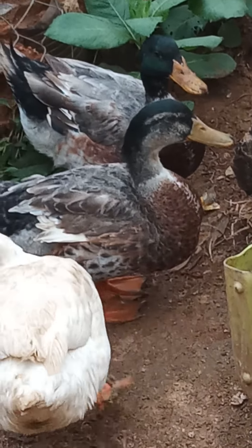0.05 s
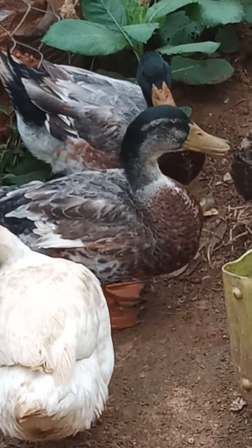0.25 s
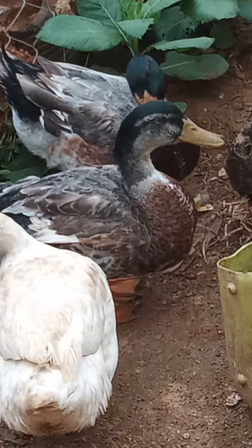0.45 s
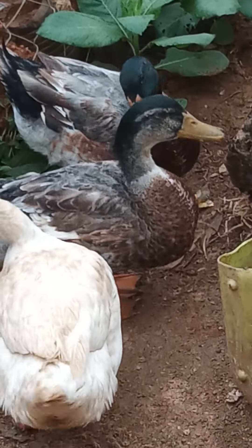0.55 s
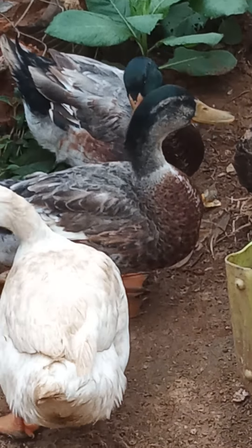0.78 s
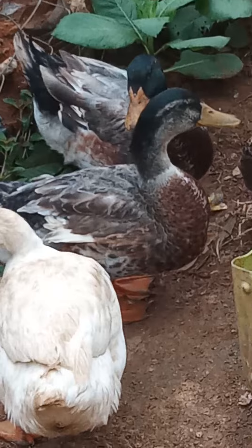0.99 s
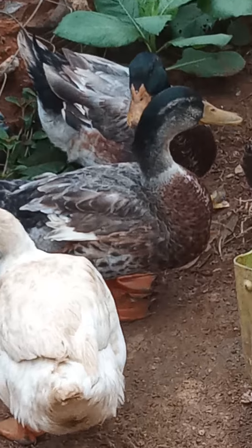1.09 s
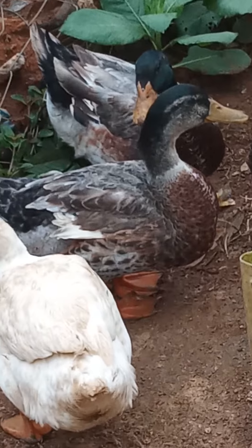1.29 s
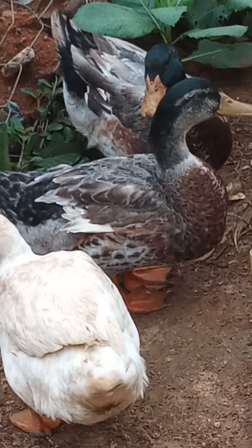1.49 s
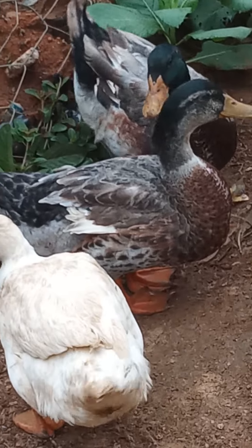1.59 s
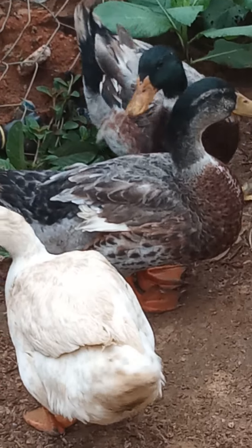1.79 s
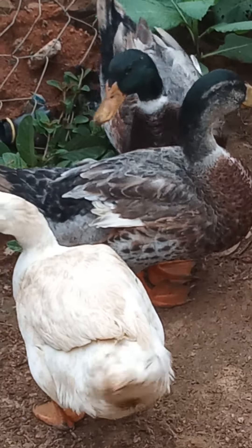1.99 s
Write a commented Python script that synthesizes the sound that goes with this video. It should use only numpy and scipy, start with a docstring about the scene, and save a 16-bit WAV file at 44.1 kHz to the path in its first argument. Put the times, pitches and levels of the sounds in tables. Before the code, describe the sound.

Short, hoarse duck quacks come at uneven intervals in a yard with a low hum.

```python
"""A distant engine hums over outdoor air throughout. At the start an insect trills, the tail of an earlier
quack fades, two faint hoarse notes sound and webbed feet pat the earth. From 0.2 s drakes a few steps away give
ten short raspy quacks, each a train of air puffs, about ninety a second, exciting the resonances of throat and
bill, with a brief yard echo. Two more trills and two more pats fall among them. The last quack comes near 1.7
s, and a faint scuff of grit follows."""
import sys
import numpy as np
from scipy import signal
from scipy.fft import rfft, irfft, next_fast_len
from scipy.io import wavfile
from scipy.ndimage import map_coordinates

SR = 44100
rng = np.random.default_rng(int(sys.argv[2]) if len(sys.argv) > 2 else 0)


def unload_audio(sound):
    """Save the sound as a 16-bit wav file, at the path given as the first command line argument."""
    columns = np.transpose(np.atleast_2d(sound))
    # keep every value between -1 and 1, then stretch to whole-number steps
    steps = np.round(np.clip(columns, -1, 1) * 32767)
    wavfile.write(sys.argv[1], SR, steps.astype(np.int16))


N = 90404


def amp(db):
    return 10 ** (np.asarray(db) / 20)

def rms(x):
    return np.sqrt(np.mean(x ** 2) + 1e-20)

def unit(x):
    return x / rms(x)

def clock():
    return np.arange(N) / SR

def gaussian(t, width):
    return np.exp(-.5 * (t / width) ** 2)

def along(points, hz):
    """Interpolation of (frequency, value) points on a logarithmic frequency axis."""
    freqs, values = np.transpose(points)
    return np.interp(np.log(hz + 1), np.log(freqs + 1), values)

def filtered(x, response):
    """Linear filtering: the spectrum of x is multiplied by a frequency response."""
    size = next_fast_len(N + SR // 4)
    return irfft(rfft(x, size) * response(np.fft.rfftfreq(size, 1 / SR)), size)[:N]

def resonate(x, resonances):
    """Forced vibration: x drives steep parallel resonators, each with its own share of the energy."""
    out = 0
    for hz, width, db in resonances:
        section = np.concatenate(signal.iirpeak(hz, hz / (2 * width), SR))
        out = out + amp(db) * unit(signal.sosfilt([section] * 4, x))
    return unit(out)

def burst(time, half_length, resonances):
    """Transient excitation: noise under a Gaussian envelope drives resonators."""
    swell = gaussian(clock() - time, half_length) + 1e-9
    return rms(swell) * resonate(swell * rng.standard_normal(N), resonances)

def add(out, start, x):
    """Superposition: x is summed into out from a start time."""
    i = round(start * SR)
    x = x[max(-i, 0):N - i]
    out[max(i, 0):][:len(x)] += x


# outdoor noise spectrum (frequency [Hz], relative density [dB])
AIR_SPECTRUM = [(15, -120), (30, -100), (45, -94), (90, -94.5), (140, -95), (220, -99), (350, -106),
                (600, -103), (1000, -102), (1500, -100.5), (2000, -100), (3100, -101), (3500, -108),
                (4000, -100), (5000, -107), (6300, -112), (7300, -110), (8000, -122), (8650, -111),
                (9600, -128), (13800, -136), (14800, -125), (15700, -122)]

def air(level_db=-63.5):
    """Stationary noise: the outdoor background keeps one spectral shape."""
    noise = filtered(rng.standard_normal(N), lambda hz: amp(along(AIR_SPECTRUM, hz)))
    return amp(level_db) * unit(noise)


# strong engine harmonics (multiple of the firing rate [1], level [dB])
ENGINE_HARMONICS = [(2, -78), (5, -65.5), (6, -72.5), (14, -82.5), (16, -75.5), (18, -83.5), (23, -83.5),
                    (28, -70.5), (39, -75.5), (52, -70), (53, -71.5), (55, -74)]
# spectral envelope of the other harmonics (frequency [Hz], level [dB])
ENGINE_ENVELOPE = [(50, -89), (200, -93.5), (330, -93), (520, -99.5), (620, -84), (770, -82), (1020, -81.5),
                   (1230, -84), (1340, -89), (1600, -85.5), (2000, -90.5), (2600, -101.5)]

def engine(firing_hz=25.76):
    """Harmonic series: periodic firing puts a far engine's sound at multiples of one rate."""
    orders = np.arange(2, 100)
    levels = along(ENGINE_ENVELOPE, orders * firing_hz) + rng.standard_normal(len(orders))
    for order, db in ENGINE_HARMONICS:
        levels[orders == order] = db
    drift = map_coordinates(rng.standard_normal(16), [clock() * 5])
    cycles = firing_hz * clock() + .001 * drift
    return sum(np.sqrt(2) * amp(db) * np.sin(2 * np.pi * (order * cycles + phase))
               for order, db, phase in zip(orders, levels, rng.random(len(orders))))


# wing resonances (offset from the chirp pitch [Hz], bandwidth [Hz], relative level [dB])
WING_MODES = [(0, 80, 0), (-230, 200, -13)]
# trills (first chirp [s], chirp rate [1/s], level [dB], chirps [count])
INSECT_TRILLS = [(.001, 25.3, -74.5, 3), (.110, 25.7, -67, 6), (.742, 25.0, -67, 7),
                 (1.448, 29.3, -67.5, 9)]

def insect(chirp_hz=8722, half_length_s=.0079):
    """Stridulation: evenly spaced strokes excite the high resonances of a wing."""
    out = np.zeros(N)
    t = np.arange(-SR // 20, SR // 20) / SR
    wing = [(chirp_hz + offset, width, db) for offset, width, db in WING_MODES]
    for start, rate, db, count in INSECT_TRILLS:
        for k in range(count):
            chirp = gaussian(t, half_length_s) * resonate(rng.standard_normal(len(t)), wing)
            add(out, start + k / rate + t[0], amp(db) * chirp)
    return out


# the fading tail of an earlier quack, then two faint notes (time [s], half-length [s], frequency [Hz], level
# [dB])
FAINT_NOTES = [(.006, 0.013, 1657, -59.5), (0.11, 0.03, 597, -71), (.254, 0.0056, 850, -52)]

def faint_notes(bandwidth_hz=108):
    """Narrow-band noise: a brief swell of it is heard as a hoarse tone."""
    out = 0
    for time, half_length, hz, db in FAINT_NOTES:
        swell = gaussian(clock() - time, half_length)
        tone = swell * resonate(rng.standard_normal(N), [(hz, bandwidth_hz, 0)])
        out = out + amp(db) * rms(swell) * unit(tone)
    return out


# foot pats (time [s], half-length [s], level [dB])
FOOT_PATS = [(0.147, 0.0056, -57), (0.185, 0.014, -66), (0.738, 0.022, -68.5), (1.317, .013, -59)]
# scuffs (time [s], level [dB])
GRIT_SCUFFS = [(1.317, -79), (1.957, -85)]
# resonances of earth and of grit (frequency [Hz], bandwidth [Hz], relative level [dB])
EARTH_MODES = [(258, 95, 14), (432, 290, 14), (640, 73, 1)]
GRIT_MODES = [(15300, 500, 0)]

def feet(scuff_half_length_s=.008):
    """Impact and friction: webbed feet draw low pats from the soil and high scuffs from its grit."""
    pats = sum(amp(db) * burst(time, half_length, EARTH_MODES) for time, half_length, db in FOOT_PATS)
    scuffs = sum(amp(db) * burst(time, scuff_half_length_s, GRIT_MODES) for time, db in GRIT_SCUFFS)
    return pats + scuffs


def yard(x, t60_s=.18):
    """Reverberation: diffuse reflections from ground, plants and walls decay exponentially."""
    t = np.arange(SR // 3) / SR
    build_up = 1 - np.exp(-t / .002)
    tail = rng.standard_normal(len(t)) * amp(-60 * t / t60_s) * build_up
    return signal.fftconvolve(x, tail / np.linalg.norm(tail))[:N]


RING_DELAY_S = .0042  # a resonance peaks about this long after its puff

def puffs(t, rate, jitter_s=.0003, shimmer_db=1.7):
    """Jitter and shimmer: the puffs of a nearly periodic train vary in timing and size."""
    k = np.arange(-7, 8)
    peaks = k / rate + jitter_s * rng.standard_normal(len(k))
    age = np.maximum(t - peaks[:, None] + RING_DELAY_S, 0)
    sizes = amp(shimmer_db * rng.standard_normal(len(k)))
    return peaks, age, sizes

def breath(t, rise, fall, exponent=1.98):
    """Amplitude envelope: a bell-shaped swell with separate rise and fall times."""
    return np.exp(-.5 * np.abs(t / np.where(t < 0, rise, fall)) ** exponent)

def puff_rings(age, sizes, resonances, onset_power=3.5, scatter_hz=51.4):
    """Impulse response: at each puff every resonance swells and decays, at a slightly different pitch."""
    out = 0
    for hz, width, db in resonances:
        scaled_age = age * width * np.pi * np.sqrt(onset_power / 2)
        envelope = scaled_age ** onset_power * np.exp(-scaled_age)
        pitch = hz + scatter_hz * rng.standard_normal((len(sizes), 1))
        wave = np.sin(2 * np.pi * (pitch * age + rng.random((len(sizes), 1))))
        out = out + amp(db) * unit(sizes @ (envelope * wave))
    return unit(out)

def turbulence(flow, resonances):
    """Flow noise: its amplitude follows the airflow, and the resonances colour it."""
    return resonate(flow * rng.standard_normal(len(flow)), resonances)


# formants of the voice bands (frequency [Hz], bandwidth [Hz], relative level [dB])
MOUTH_FORMANTS = [(1380, 180, -15), (1620, 220, -16), (1960, 220, -15), (2265, 170, 0)]
BILL_FORMANTS = [(2880, 130, 0), (3240, 110, -12)]
RASP_FORMANTS = [(3860, 150, 0), (4500, 220, -1.5)]
BILL_TIP_FORMANT = [(6152, 235, -13.5)]
# hiss formants (offset from the hiss pitch [Hz], bandwidth [Hz], relative level [dB])
HISS_FORMANTS = [(-330, 170, -5), (30, 130, 0), (400, 150, -8)]
# quacks; the fourth opens with a single hard puff, which has its own row
# (time [s], rise [s], fall [s], puff rate [1/s], throat pitch [Hz], hiss pitch [Hz], hiss lead [s],
#  hiss half-length [s], throat level [dB], mouth level [dB], bill level [dB], rasp level [dB],
#  hiss level [dB])
DRAKE_QUACKS = [ (.216, 0.016, 0.02, 80, 1864, 5700, .006, 0.0096, -56, -45, -61.5, -67, -49),
                (0.336, 0.019, .018, 95, 1860, 5980, 0.00024, .012, -52, -42, -69.5, -61, -56),
                (0.514, 0.02, 0.014, 90, 1690, 5670, 0.00014, 0.013, -58, -52, -59, -62.5, -55),
                (0.572, 0.0071, 0.0048, 93, 2295, 6000, -0.01, 0.0045, -42.5, -43.5, -71, -66, -60),
                (0.592, 0.0073, 0.02, 108, 1785, 6055, -0.003, 0.014, -51.5, -43, -83, -59, -60.5),
                (0.759, 0.026, 0.012, 78, 1757, 5486, 0.0071, .014, -42.5, -52.5, -55, -54.5, -47),
                (0.988, 0.023, .016, 73, 1765, 5330, 0.0046, 0.014, -37.5, -48.5, -51, -45, -39),
                (1.109, 0.017, 0.018, 91, 1665, 5696, 0.0058, 0.015, -56, -45.5, -65.5, -73, -55.5),
                (1.380, 0.018, 0.013, 82.5, 1675, 5670, 0.0065, .012, -51.5, -48, -55, -71, -53.5),
                (1.512, 0.02, 0.015, 84, 1880, 5390, -0.0033, 0.015, -43, -47, -59, -59, -51.5),
                (1.738, 0.019, 0.016, 77.6, 1877, 5330, -0.0059, 0.016, -40.5, -43.5, -43.5, -47, -44.5)]

def drakes(steady_flow=.75, puff_decay_s=.015, throat_width_hz=220, breathy_db=-4,
           high_ring_db=-2.5, high_widening=1.27, cutoff_hz=7240):
    """Source and filter: air puffs excite the formants of throat and bill and modulate a shorter hiss."""
    out = np.zeros(N)
    t = np.arange(-SR // 10, SR // 10) / SR
    for time, rise, fall, rate, throat_hz, hiss_hz, lead, half_length, *levels in DRAKE_QUACKS:
        throat_db, mouth_db, bill_db, rasp_db, hiss_db = levels
        peaks, age, sizes = puffs(t, rate)
        flow = steady_flow + sizes @ (np.exp(-age / puff_decay_s) * (age > 0))
        body = lambda at: breath(at, rise, fall)
        jet = lambda at: breath(at + RING_DELAY_S + lead, half_length, half_length)
        throat = [(throat_hz, throat_width_hz, 0)]
        hiss = [(hiss_hz + offset, width, db) for offset, width, db in HISS_FORMANTS] + BILL_TIP_FORMANT
        voice = 0
        # low bands: ringing outweighs turbulence
        for formants, band_db in [(throat, throat_db), (MOUTH_FORMANTS, mouth_db),
                                  (BILL_FORMANTS, bill_db)]:
            rings = puff_rings(age, sizes * body(peaks), formants)
            noise = amp(breathy_db) * turbulence(body(t) * flow, formants)
            voice = voice + amp(band_db) * rms(body(t)) * unit(rings + noise)
        # high bands: turbulence dominates, and the widened rings die sooner
        for formants, band_db in [(RASP_FORMANTS, rasp_db), (hiss, hiss_db)]:
            damped = [(hz, high_widening * width, db) for hz, width, db in formants]
            rings = amp(high_ring_db) * puff_rings(age, sizes * jet(peaks), damped)
            noise = turbulence(jet(t) * flow, formants)
            voice = voice + amp(band_db) * rms(jet(t)) * unit(rings + noise)
        add(out, time + t[0], voice)
    return signal.sosfilt(signal.butter(8, cutoff_hz, fs=SR, output="sos"), out)


def scene(echo_db=-13):
    """Superposition: near sounds and their yard echo add to engine, air and insect."""
    near = drakes() + feet() + faint_notes()
    return (near + amp(echo_db) * yard(near) + engine() + air() + insect())[None]

def record(dry):
    """Band limiting: an ideal low-pass filter removes everything above 15.8 kHz."""
    return np.array([filtered(x, lambda hz: hz < 15800) for x in dry])


dry = scene()
out = record(dry)
unload_audio(out)
```